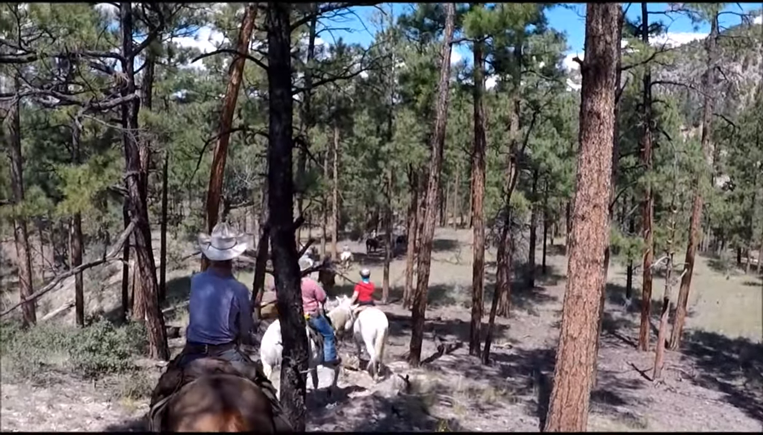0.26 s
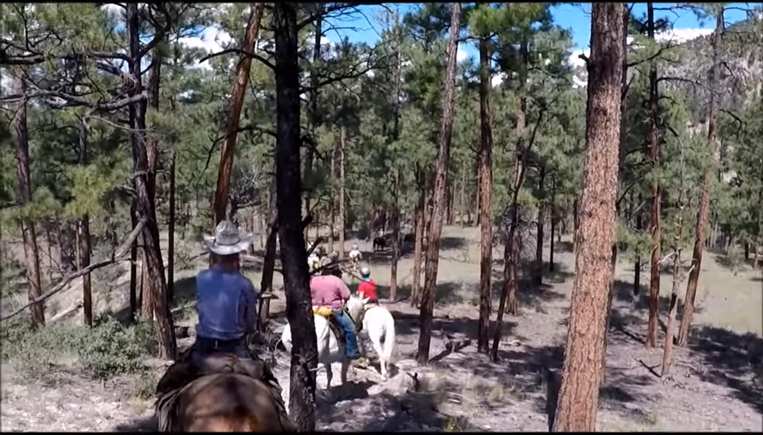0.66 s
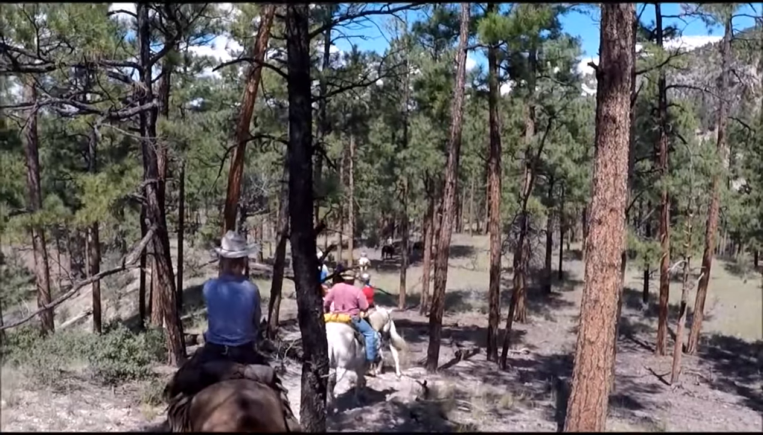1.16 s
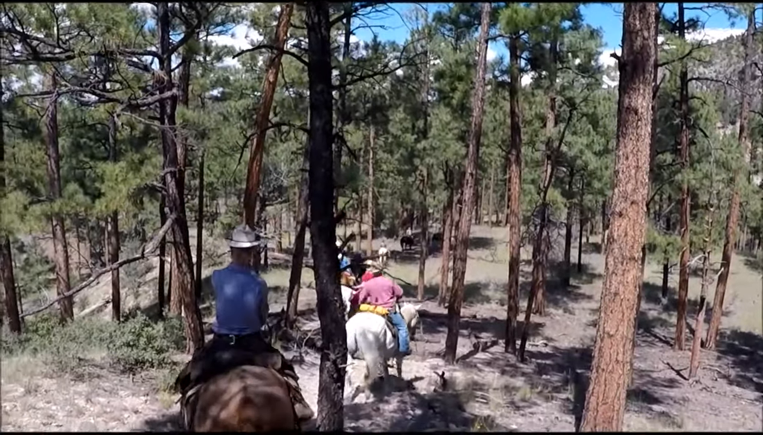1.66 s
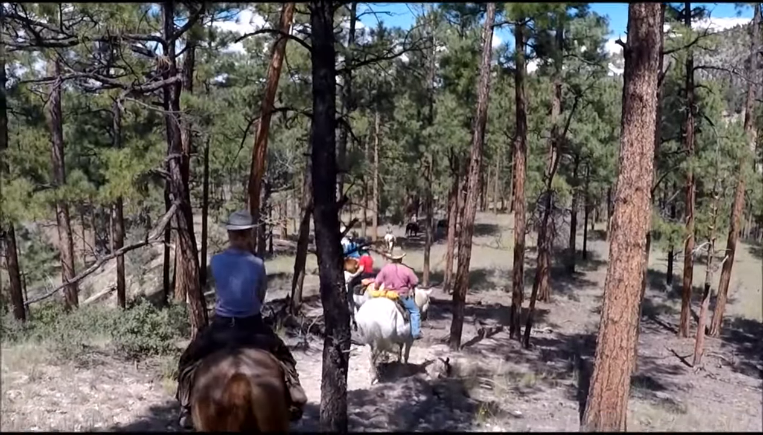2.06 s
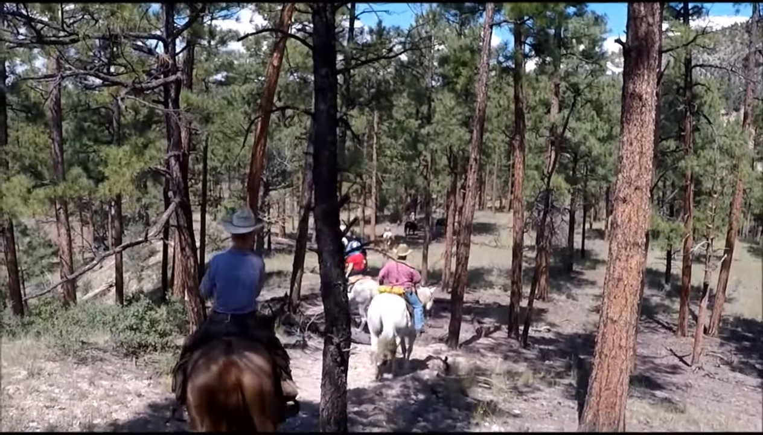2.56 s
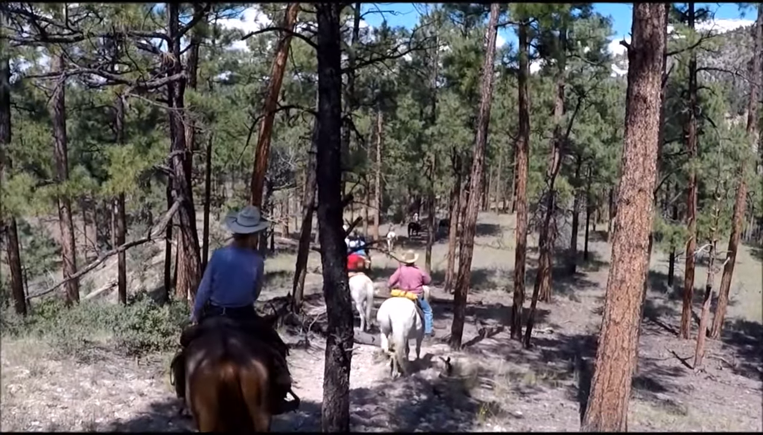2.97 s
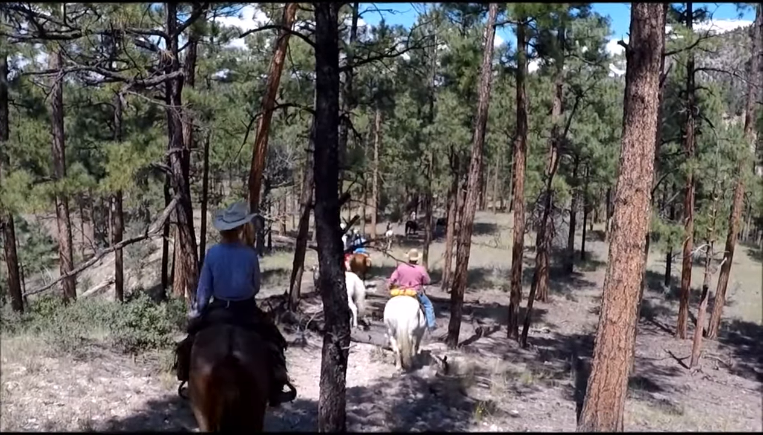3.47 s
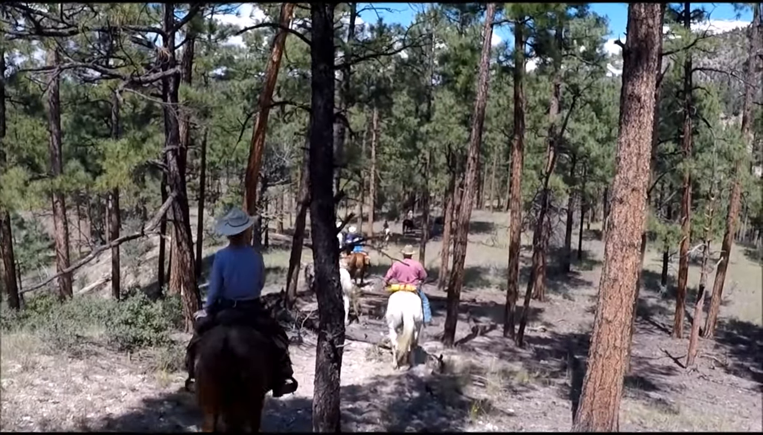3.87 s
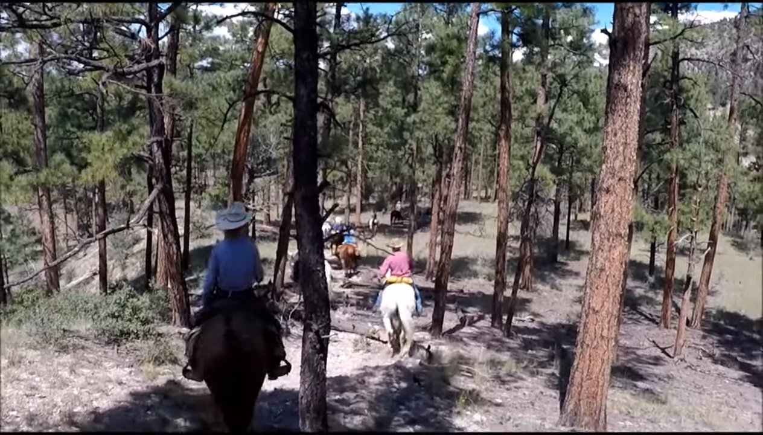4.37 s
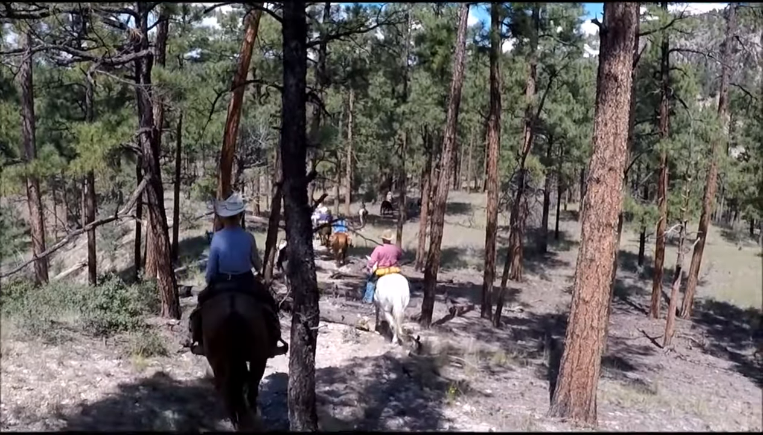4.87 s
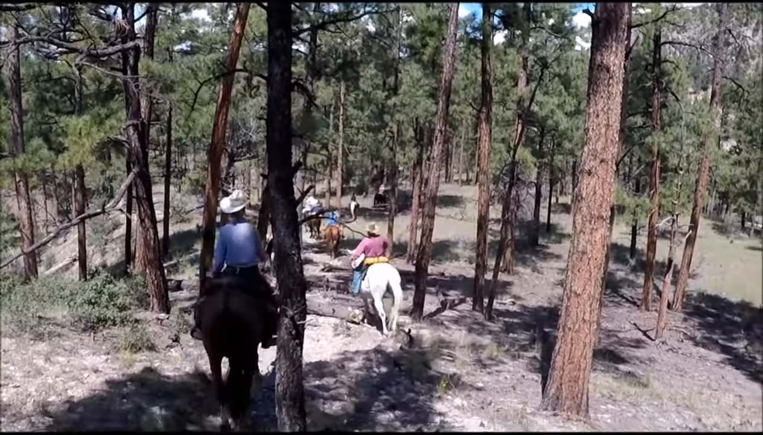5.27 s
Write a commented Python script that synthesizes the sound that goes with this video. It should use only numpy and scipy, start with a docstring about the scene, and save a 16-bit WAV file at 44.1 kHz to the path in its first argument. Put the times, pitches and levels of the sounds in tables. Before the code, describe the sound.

Outdoors in open pine forest, a string of horses walks over a stony trail. A very low distant engine drone, around 70 hertz and slowly sinking, runs throughout; it is strong at first, thins around 2.5 s, and swells again near 4 s. Wind rumbles on the microphone, with soft low thumps near 0.1, 3.7 and 5.2 s. Hoofbeats are irregular: hollow knocks at 0.25 and 0.55 s, a heavy one at 0.9, a bright iron-on-stone clack at 1.27, a metallic click at 1.74 and another heavy knock at 1.84. From 2 to 4 s steps are sparser and lighter, with tiny tack clinks near 3.5. Knocks resume from 4.15, one strong and hollow at 4.95, then quick clicks and a brighter clink at 5.44. Short gravel rasps, dull farther hooves, a faint trunk echo, pine rush and thin hiss fill the gaps.

```python
"""A string of horses walks along a stony trail in open pine forest.
Each step drives ringing modes: the hollow hoof, the stone and the iron shoe.
Short noise bursts make gravel rasps and the hollow body of some heavy knocks.
Short sine pairs make the clinks of the tack, and scattered weak reflections make the echo off the trunks.
A far engine drones on three low tones, slowly sinking in pitch.
Shaped noise makes the wind on the microphone, the rush of the pines and a steady hiss."""
import sys
import numpy as np
from scipy import signal
from scipy.fft import rfft, irfft
from scipy.io import wavfile

SR = 44100
rng = np.random.default_rng(int(sys.argv[2]) if len(sys.argv) > 2 else 0)


def store_pcm(level_fs):
    """Save levels as 16-bit WAV."""
    pcm = np.round(np.clip(level_fs, -1, 1) * 32767).astype(np.int16)
    wavfile.write(sys.argv[1], SR, np.atleast_2d(pcm).T)


N = 243873
TIME = np.arange(N) / SR
HIT_TIME = np.arange(8192) / SR  # time axis of one short sound, in seconds
LEAD_IN_S = 0.006  # a faint crackle leads into each blow for this long

# ringing of the hoof, deep knock and higher wall: pitch_hz [Hz], level_db [dB, relative],
# t60_s [s to die away by 60 dB]
KNOCK_MODES = [(550, -5.5, 0.018), (647, 3, 0.016), (900, -8, 0.016)]
WALL_MODES = [(1004, 0.22, 0.0071), (1095, -0.54, 0.01), (1393, -0.36, 0.0074)]


def from_db(db):
    """Turn decibels into a gain."""
    return 10 ** (np.asarray(db) / 20)


def rms_one(x):
    """Scale a sound to an rms (average strength) of 1."""
    return x / np.sqrt(np.mean(x ** 2) + 1e-20)


def in_time(rows):
    """Draw each column of a table as a curve over the whole scene; the first column is time."""
    s, *columns = np.transpose(rows)
    return [np.interp(TIME, s, column) for column in columns]


def add(out, s, sound):
    """Mix a sound in from time s on."""
    at = max(0, round(s * SR))
    out[at:at + len(sound)] += sound[:max(0, N - at)]


def coloured(x, spectrum):
    """Give a noise the balance of low and high in a table of (Hz, dB); rms 1."""
    hz, db = np.transpose(spectrum)
    log_hz = np.log(np.fft.rfftfreq(len(x), 1 / SR) + 1)
    gain = from_db(np.interp(log_hz, np.log(hz), db, left=-90, right=-90))
    return rms_one(irfft(rfft(x) * gain, len(x)))


def band(x, low_hz, high_hz):
    """Keep the part of a sound between two pitches."""
    sos = signal.butter(2, [low_hz, min(high_hz, 0.45 * SR)], "band", fs=SR, output="sos")
    return signal.sosfilt(sos, x + 1e-18)


def drift(rate):
    """Wander slowly at random, with about rate turns a second; rms 1."""
    white = rfft(rng.standard_normal(N))
    smoothing = 1 + (np.fft.rfftfreq(N, 1 / SR) / rate) ** 4
    return rms_one(irfft(white / smoothing, N))


def ring(force, hz, t60):
    """Let a force set off one mode, a single pitch that dies away by 60 dB in t60 seconds."""
    radius = from_db(-60 / (t60 * SR))  # what is left after each sample
    angle = 2 * np.pi * hz / SR
    return signal.lfilter([1, 0, -1], [1, -2 * radius * np.cos(angle), radius ** 2], force + 1e-18)


def grains(per_s, spread_db, size):
    """Scatter random clicks of uneven strength, about per_s of them a second."""
    strength = from_db(spread_db * np.minimum(rng.exponential(1, size), 4))
    sign = rng.choice([-1, 1], size)
    return strength * sign * (rng.random(size) < per_s / SR)


def hoof_force(crunch_db, heel_s=0.0026, heel_db=-6, settle_s=0.0042, settle_db=-4,
               crunch_s=0.016, lead_in_db=-13, lead_in_s=0.0026):
    """A short faint crackle leads into the toe's landing; the heel follows, grit gives way under the weight."""
    toe = round(LEAD_IN_S * SR)
    since_toe = HIT_TIME - HIT_TIME[toe]
    after = since_toe >= 0
    size = len(HIT_TIME)

    def crackle(per_s, spread_db, fade_s, when):
        """Random clicks, stronger the closer they are to the landing of the toe; rms 1."""
        fade = np.exp(-abs(since_toe) / fade_s)
        return rms_one(grains(per_s, spread_db, size) * fade * when)

    blow = np.zeros(size)
    blow[toe] = 1
    heel_delay_s = heel_s * rng.uniform(0.6, 1.4)
    blow[toe + round(heel_delay_s * SR)] = from_db(heel_db)

    force = rms_one(blow)
    force += from_db(lead_in_db) * crackle(15000, 0.79, lead_in_s, ~after)
    force += from_db(settle_db) * crackle(9000, 1.0, settle_s, after)
    force += from_db(crunch_db) * crackle(6000, 2.5, crunch_s, after)
    return force


def far_horses(step_db=-63, gravel_db=-72):
    """The horses further ahead give dull little knocks and a soft shuffle of gravel."""
    steps = signal.fftconvolve(grains(24, 1, N), hoof_force(crunch_db=-1.5))[:N]
    knocks = sum(from_db(db) * ring(steps, hz, t60) for hz, db, t60 in KNOCK_MODES + WALL_MODES)
    gravel = band(grains(2800, 9.3, N), 1500, 6000)
    return from_db(step_db) * rms_one(band(knocks, 416, 1080)) + from_db(gravel_db) * rms_one(gravel)


def engine(start_hz=73.0, sag_hz_per_s=0.72, waver_hz=0.071, fade_db=-0.1, third_re_first_db=-29):
    """A far engine slowly losing speed: three low orders, wavering on their way through the air."""
    # fading of the two lowest orders over the distance: start_s [s], first_db [dB rms], second_db [dB rms]
    order_levels = [(0, -21.5, -65), (.9, -25.5, -52), (1.8, -30.5, -53.5), (2.5, -39.5, -64),
                    (3.2, -29.5, -48), (3.65, -22, -39), (4.1, -21.5, -41), (4.75, -24, -44.5),
                    (5.53, -32, -39.5)]
    first_db, second_db = in_time(order_levels)
    hz = start_hz - sag_hz_per_s * TIME + waver_hz * drift(3.8)
    phase = 2 * np.pi * np.cumsum(hz) / SR
    out = np.zeros(N)
    for order, db in enumerate((first_db, second_db, first_db + third_re_first_db), 1):
        level = np.sqrt(2) * from_db(db + fade_db * drift(1.4))  # root 2 turns rms into peak
        out += level * np.sin(order * phase + rng.uniform(0, 2 * np.pi))
    return out


def wind(rumble_trim_db=0.68, flutter_db=-50, flutter_follows=0.66, lumpy_db=2.4, bump_s=0.0042):
    """Eddies rumble and flutter at the microphone, both rising with the gusts; some thump it."""
    # strength of the wind: start_s [s], level_db [dB, before the trim]
    gusts = [(0, -26.5), (1.3, -30), (2, -33), (3, -33.5), (3.75, -26), (4.3, -29.5), (4.6, -27.5),
             (5.2, -29.5), (5.53, -31)]
    # balance of the deep rumble and of the flutter above it: pitch_hz [Hz], level_db [dB per Hz, relative]
    rumble_spectrum = [(6, 2), (10, 4), (30, 1.5), (60, 1.5), (80, -3.5), (100, -9), (130, -14),
                       (180, -24.5), (300, -44.5)]
    flutter_spectrum = [(70, -35), (120, -1), (170, 0), (215, -0.5), (255, -4), (305, -4), (400, -12.5),
                        (800, -52)]
    # single thumps: start_s [s], level_db [dB at the top of the swell], pitch_hz [Hz]
    bumps = [(0.125, -10.5, 69), (0.18, -31, 116), (3.689, -11, 74), (4.099, -22, 132), (5.203, -20, 56)]

    gust_db, = in_time(gusts)
    swing_db = flutter_follows * (gust_db - gust_db.mean()) + lumpy_db * drift(23)
    out = from_db(gust_db + rumble_trim_db) * coloured(rng.standard_normal(N), rumble_spectrum)
    out += from_db(flutter_db + swing_db) * coloured(rng.standard_normal(N), flutter_spectrum)

    swell = HIT_TIME / bump_s * np.exp(1 - HIT_TIME / bump_s)  # reaches 1 after bump_s
    for s, db, hz in bumps:
        add(out, s, from_db(db) * swell * np.sin(2 * np.pi * hz * HIT_TIME))
    return out


def air(trim_db=2.0, hiss_db=-67.5):
    """Noise with a drifting level is the soft rush of the pines; steady noise is the microphone hiss."""
    # strength of the rush: start_s [s], level_db [dB, before the trim]
    rush_levels = [(0.0, -57.5), (1.25, -56.5), (2.83, -58), (3.34, -56), (4.79, -57.5), (5.53, -53)]
    # balance of the rush and of the hiss: pitch_hz [Hz], level_db [dB per Hz, relative]
    rush_spectrum = [(210, -41), (350, -8.5), (403, -3), (436, -3), (495, -1), (579, -3.5), (616, -6.5),
                     (844, -7.5), (885, -11), (1090, -10), (1190, -10), (2420, -15.5), (3640, -17),
                     (9970, -27), (15000, -46.5)]
    hiss_spectrum = [(3000, -35), (6000, -2), (8000, -9), (9800, -1.5), (11500, -9), (13500, -10.5),
                     (15000, -22)]
    level_db, = in_time(rush_levels)
    pines = from_db(level_db + trim_db) * coloured(rng.standard_normal(N), rush_spectrum)
    return pines + from_db(hiss_db) * coloured(rng.standard_normal(N), hiss_spectrum)


def struck(force, modes, detune=0.015):
    """A blow rings a group of modes, a little different every time; rms 1."""
    rung = np.zeros(len(force))
    for hz, db, t60 in modes:
        level = from_db(db + rng.normal(0, 1))
        rung += level * ring(force, hz * np.exp(detune * rng.normal()), t60)
    return rms_one(band(rung, modes[0][0] * 0.75, modes[-1][0] * 1.033))


def with_note(force, modes, hz, t60, note_db, reach=0.5):
    """The point of contact brings out one note, strongest in modes within reach octaves of it; rms 1."""
    octaves_off = np.log2(hz / modes[len(modes) // 2][0])
    nearness = 1 / (1 + (octaves_off / reach) ** 6)
    note = rms_one(band(ring(force, hz, t60), hz * 0.76, hz * 1.34))
    return rms_one(struck(force, modes) + nearness * from_db(note_db) * note)


def hooves(knock_db=-17, wall_db=-14, clack_db=-13, shoe_db=-14.5, grit_db=-17,
           wall_stone_share=0.23, contact_s=0.0005, body_crunch_db=-5):
    """Every step rings the hollow hoof, the stone under it and the iron shoe."""
    # hoof strikes: start_s [s], knock_db, clack_db (on stone), shoe_db, grit_db [dB, before the group trims],
    # note_hz [Hz, strongest note], crunch_db [dB against the blow, before the trim for the heavy hoof]
    strikes = [(0.153, -54, -57.5, -56, -62, 3960, 7), (0.243, -34.5, -56, -64, -69, 1085, -9),
               (0.314, -53, -60, -67, -70, 875, -18), (0.5388, -36.5, -41, -42.5, -62, 1010, 0),
               (0.556, -43, -43.5, -46.5, -59, 1910, 0), (0.721, -44, -62, -72, -76, 880, -10),
               (0.891, -30, -49, -47.5, -47.5, 915, 2), (0.922, -35, -47.5, -53, -65, 960, -5),
               (1.246, -49, -46, -57, -68, 1860, -9), (1.258, -63, -48, -42, -62, 4180, -8),
               (1.271, -48, -38, -33, -38.5, 4880, -23), (1.404, -49, -50, -53, -60, 2180, 8),
               (1.468, -62, -67, -54.5, -62, 3760, -3), (1.565, -76, -52, -54.5, -63, 2740, -15),
               (1.741, -55, -46.5, -37, -43, 3950, 0), (1.836, -29, -50.5, -47, -45.5, 1426, -8),
               (1.888, -55, -56, -46.5, -47, 5100, -1), (1.894, -62, -59, -47.5, -49, 4370, 0),
               (1.965, -45.5, -58, -61, -60, 1430, -9), (2.389, -65, -57, -47, -67, 3930, -11),
               (2.456, -50, -58, -70, -77, 1340, -15), (2.482, -45.5, -67, -64, -69, 820, 3),
               (3.02, -43, -68, -57, -60, 830, 4), (3.043, -43.5, -61, -57, -59, 1020, -3),
               (3.173, -49, -58, -51, -57, 3970, 7), (3.207, -44, -50.5, -44.5, -45.5, 4030, -10),
               (3.412, -59, -56, -65, -62, 2100, -17), (3.54, -42.5, -61, -73, -81, 970, -6),
               (3.557, -52, -69, -51.5, -52, 3600, -9), (3.581, -38.5, -60, -59, -53, 880, 10),
               (4.151, -47, -58, -53, -70, 1060, 9), (4.294, -41.5, -46.5, -49.5, -66, 1610, 0.5),
               (4.36, -56, -54.5, -69, -73, 2460, -4), (4.488, -36.5, -61, -69, -62, 1150, -5),
               (4.516, -47, -48.5, -48.5, -56, 3680, 6), (4.701, -70, -64, -53, -58, 3500, -1),
               (4.77, -72, -53.5, -49.5, -51, 3700, -5), (4.945, -31.5, -84, -60, -64, 850, 2.5),
               (4.958, -52, -50, -52.5, -52, 2480, 17), (5.114, -68, -56, -51.5, -50, 4970, 1),
               (5.209, -49, -50, -51, -72, 1210, 7), (5.26, -47, -58, -48, -50.5, 3670, -2),
               (5.29, -55, -54, -48, -58, 4740, -1), (5.4, -43.5, -42, -48, -60, 2020, -12),
               (5.444, -58, -43.5, -46, -56, 2090, -9), (5.491, -50, -45, -53, -68, 1850, -14)]
    # ringing of shoe and stone: pitch_hz [Hz], level_db [dB, relative], t60_s [s to die away by 60 dB]
    clack_modes = [(1865, -2, 0.0098), (2320, -1.5, 0.0034), (2650, 3.5, 0.0042)]
    shoe_modes = [(3600, -1, 0.0036), (3990, 6.5, 0.0085), (4620, 8.5, 0.006), (5220, -9, 0.0071),
                  (5400, -5, 0.0024)]
    grit_modes = [(6300, 18.5, 0.0022), (7230, 15, 0.0035), (8800, 3, 0.0031), (9700, -30.5, 0.0044)]

    out = np.zeros(N)
    for s, knock, clack, shoe, grit, note_hz, crunch_db in strikes:
        # the hoof wall rings with the knock and partly with the clack on stone
        wall = knock + wall_stone_share * (clack - knock)
        heavy = hoof_force(crunch_db + body_crunch_db)  # the heavy hoof hardly feels the grit
        sharp = hoof_force(crunch_db)
        step = from_db(knock + knock_db) * struck(heavy, KNOCK_MODES)
        step += from_db(wall + wall_db) * with_note(heavy, WALL_MODES, note_hz, t60=0.042, note_db=-1.5)
        step += from_db(clack + clack_db) * with_note(sharp, clack_modes, note_hz, t60=0.01, note_db=3)
        step += from_db(shoe + shoe_db) * with_note(sharp, shoe_modes, note_hz, t60=0.016, note_db=-1.5)
        step += from_db(grit + grit_db) * struck(sharp, grit_modes)
        add(out, s + contact_s - LEAD_IN_S, step)
    return out


def clinks(decay_s=0.0032, pair=0.94):
    """Bit rings and buckles touch and ring briefly on a close pair of modes."""
    # clinks of the tack: start_s [s], level_db [dB, main mode], pitch_hz [Hz, main mode]
    tack_hits = [(0.154, -50.5, 3950), (0.534, -53, 5270), (1.734, -42, 4700), (1.772, -45, 3650),
                 (2.957, -49, 6440), (3.447, -45.5, 5800), (3.491, -44, 5550), (3.510, -45, 5360),
                 (5.444, -34, 5350)]
    out = np.zeros(N)
    for s, db, hz in tack_hits:
        phase = 2 * np.pi * hz * HIT_TIME
        tone = np.sin(phase) + 0.5 * np.sin(pair * phase)
        add(out, s, from_db(db) * np.exp(-HIT_TIME / decay_s) * tone)
    return out


def noise_bursts(width=1.34, clump_db=3.5, rise=0.48):
    """Clumpy noise swells and dies away: gravel rasps, and the hollow body of some heavy knocks."""
    # short noise bursts: peak_s [s], level_db [dB at the peak], centre_hz [Hz],
    # length_s [s, split by rise into the time constants of swelling and dying away]
    bursts = [(0.2, -54.5, 4600, 0.034), (0.35, -49.5, 3140, 0.027), (0.539, -42.5, 5030, 0.012),
              (0.574, -52, 2900, 0.053), (0.894, -31, 910, 0.0086), (0.904, -51, 6100, .015),
              (0.92, -48, 1000, .008), (0.98, -57.5, 3600, .035), (1.28, -39.5, 3400, .017),
              (1.407, -53, 1680, .028), (1.455, -54, 5960, 0.066), (1.541, -54, 6500, .022),
              (1.742, -39.5, 4640, 0.019), (1.951, -47, 1410, 0.026), (2.099, -54, 3280, .038),
              (2.392, -48.5, 4070, 0.0084), (3.181, -39.5, 860, 0.014), (3.22, -56, 3260, 0.032),
              (3.647, -52.5, 910, 0.04), (3.653, -57, 3780, .064), (4.77, -55.5, 4300, 0.04),
              (4.961, -45, 836, .04), (4.965, -56.5, 2820, .024), (5.048, -44, 535, 0.016),
              (5.221, -50.5, 1430, 0.056), (5.25, -54.5, 3200, 0.15), (5.25, -47.5, 596, 0.092),
              (5.45, -42.5, 5240, 0.023)]
    out = np.zeros(N)
    clumpy_noise = grains(4000, 4.2, N) * from_db(clump_db * drift(100))
    for s, db, hz, length_s in bursts:
        along = (TIME - s) / length_s
        slope = np.minimum(along / rise, -along / (1 - rise))
        swell = np.exp(np.maximum(slope, -40))
        out += from_db(db) * swell * rms_one(band(clumpy_noise, hz / width, hz * width))
    return out


def forest(x, echo_db=-15, t60=0.44, build_s=0.0044):
    """Many weak reflections come back from the trunks, building up fast and then dying away."""
    # balance of the scatter off the trunks: pitch_hz [Hz], level_db [dB, relative]
    scatter_spectrum = [(300, -6), (700, -22.5), (2000, 2), (5000, -2), (10000, 1.5)]
    t = TIME[:SR]
    reflections = coloured(grains(2500, 2.7, SR), scatter_spectrum)
    echoes = reflections * from_db(-60 * t / t60) * (1 - np.exp(-t / build_s))
    echoes = rms_one(echoes) / np.sqrt(SR)  # total energy 1
    return from_db(echo_db) * signal.fftconvolve(x, echoes)[:N]


def scene(top_hz=10000):
    """Horses among the trees, dulled by distance, over engine drone, wind and air."""
    horses = band(hooves() + noise_bursts() + clinks() + far_horses(), 250, top_hz)
    return (horses + forest(horses) + engine() + wind() + air())[None]


def record(dry, cutoff_hz=15200):
    """A steep filter cuts the top of the sound."""
    sos = signal.ellip(10, 0.1, 80, cutoff_hz, fs=SR, output="sos")
    return signal.sosfilt(sos, dry)


dry = scene()
out = record(dry)
store_pcm(out)
```